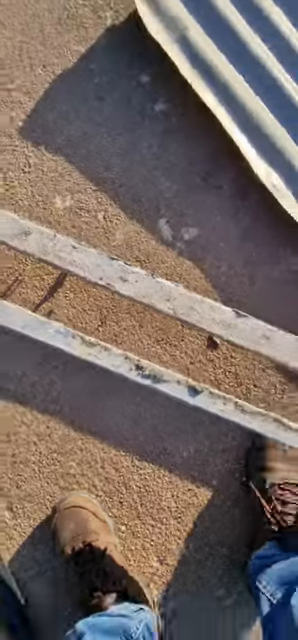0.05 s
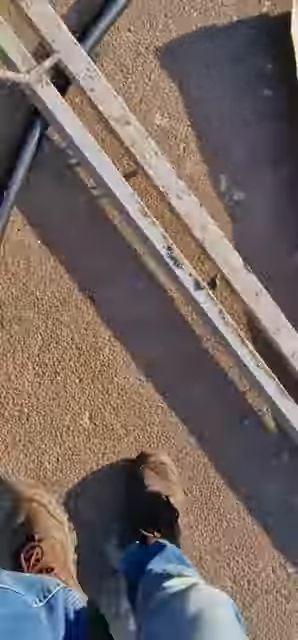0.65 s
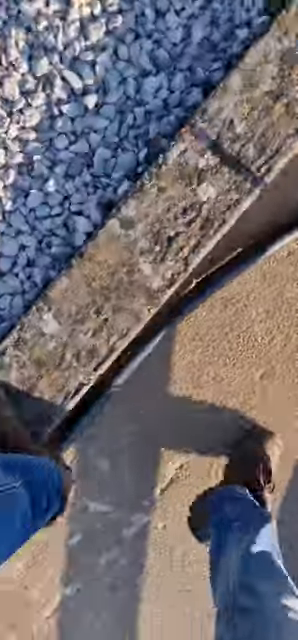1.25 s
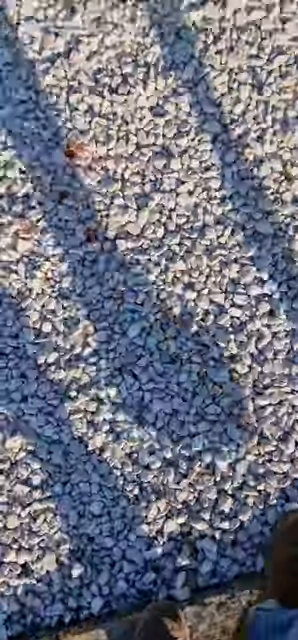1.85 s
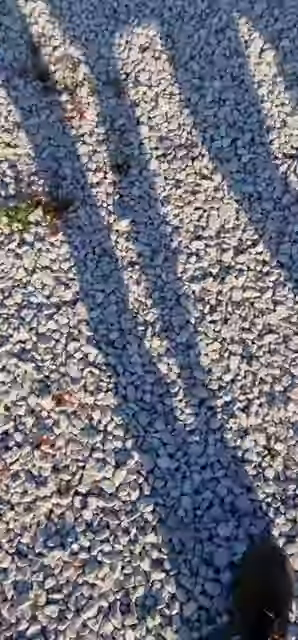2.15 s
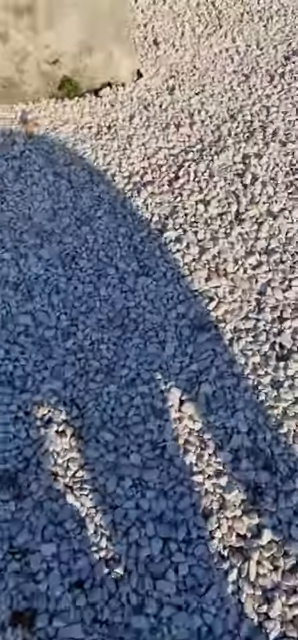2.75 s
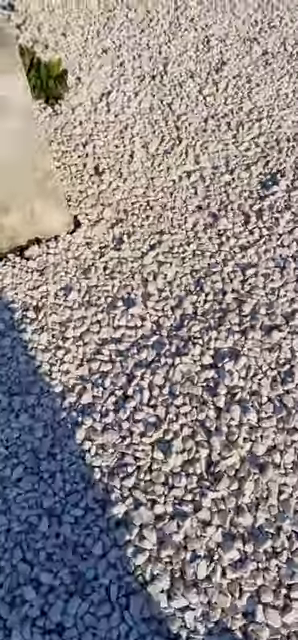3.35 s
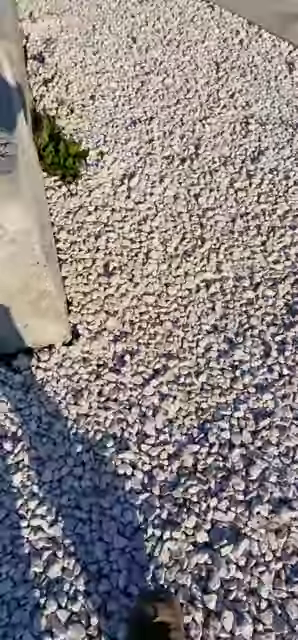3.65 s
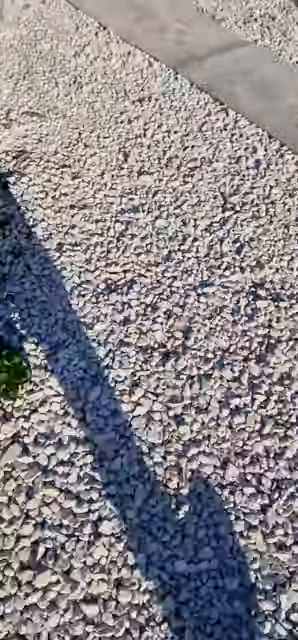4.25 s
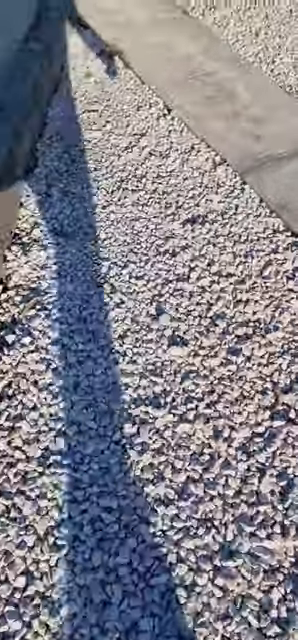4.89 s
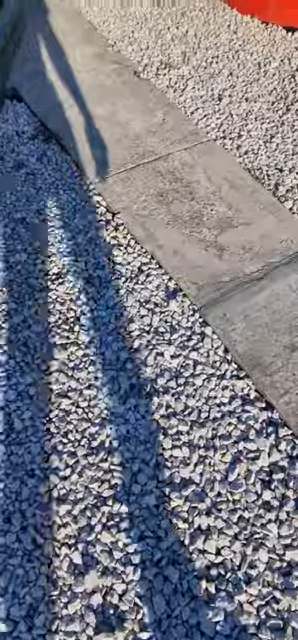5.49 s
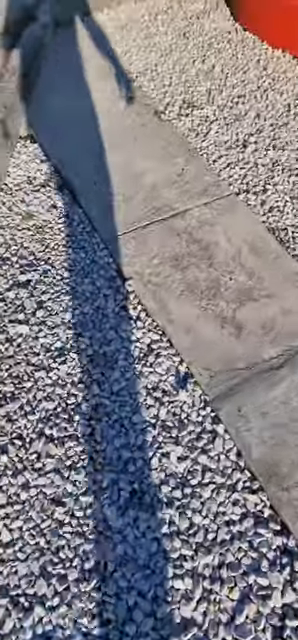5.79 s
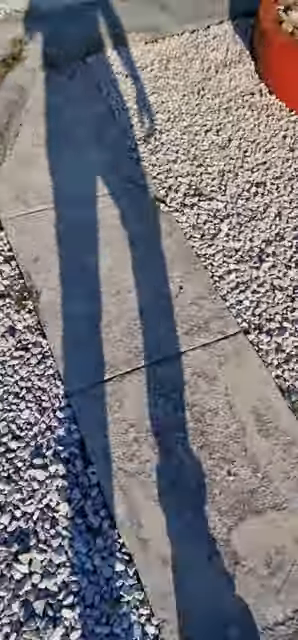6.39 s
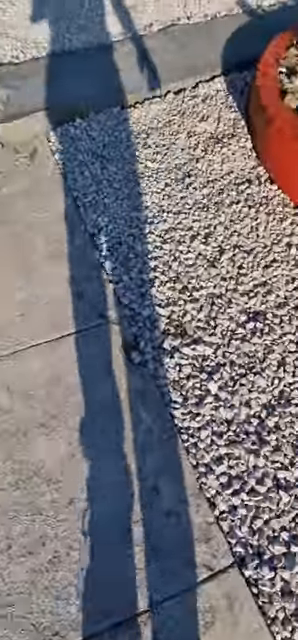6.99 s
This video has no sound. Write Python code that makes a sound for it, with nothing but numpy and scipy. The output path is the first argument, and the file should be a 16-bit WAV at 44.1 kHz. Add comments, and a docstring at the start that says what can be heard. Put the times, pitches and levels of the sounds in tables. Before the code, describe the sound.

A steel scraper rasps and rings along concrete, then knocks sharply, as boots crunch over gravel outdoors.

```python
"""Concrete edging between hard walls, with gravel underfoot. A steel hand scraper rasps along it, first
in firm ringing strokes, then in looser ones from the right. Sand breaks under the edge and rings the
blade; the edge snags on stones, squeals by stick-slip and knocks against the concrete, and the walls
answer. Close by, boots crunch over pebbles as the listener walks on, over a hush and low wind rumble."""
import sys
import numpy as np
from scipy import signal
from scipy.fft import rfft, irfft
from scipy.io import wavfile
from scipy.ndimage import uniform_filter1d

SR = 44100
rng = np.random.default_rng(int(sys.argv[2]) if len(sys.argv) > 2 else 0)


def to_wav(s):
    """Save 16-bit WAV."""
    ch = np.atleast_2d(s).T  # columns
    pcm = np.round(np.clip(ch, -1, 1) * 32767)  # PCM
    wavfile.write(sys.argv[1], SR, pcm.astype(np.int16))


N = 309955
TIME = np.arange(N) / SR

# steel resonances (frequency [Hz], width [Hz], gain [dB])
BLADE_MODES = [(1993, 8.4, 15.5), (2196, 64, 0.5)]
TOOL_OVERTONES = [(595, 48, -22), (1387, 25, 8.5), (1493, 19, 3.5), (3340, 33, -22), (4204, 39, 9.5),
                  (4710, 47, 4), (5374, 160, 2.5), (7190, 98, 1.5), (10960, 240, 3.5), (14900, 80, -2.5)]
# stereo colour of work on the right (frequency [Hz], left minus right [dB])
BALANCE_ASIDE = [(300, -1.5), (1200, -0.5), (2000, -1.5), (4300, -8.5), (5800, -5), (7200, 4), (9000, -7.5),
                 (10500, 4), (12000, -16), (15000, -8)]
# footfalls (time [s], thump [dB], scatter [dB])
FOOTFALLS = [(2.15, -44, -39), (2.73, -40, -52), (3.28, -40.5, -44), (3.792, -41, -37), (4.341, -42, -43),
             (4.91, -46, -53), (5.47, -41, -52), (6.06, -45, -44), (6.65, -52, -47)]


def strokes():
    """Scraper strokes: firm and chattering from all sides, then loose and sliding from the right."""
    # (start [s], rise [s], hold [s], grind [dB], ring [dB], rasp [dB], hiss [dB])
    passes = [(0.0, 0.0067, 0.086, -25, -22.5, -30, -27), (0.152, 0.047, 0.057, -28.5, -27.5, -36.5, -31.5),
              (0.239, 0.058, 0.039, -25.5, -23.5, -32.5, -32.5),
              (0.389, 0.08, 0.045, -22.5, -22.5, -30, -25), (0.603, 0.023, 0.032, -26.5, -23.5, -29, -25),
              (0.663, 0.032, 0.015, -24.5, -19, -23.5, -18), (0.74, .03, 0.011, -28.5, -27.5, -32, -29),
              (0.824, 0.05, 0.07, -27.5, -24, -33, -29), (1.021, 0.037, 0.023, -32.5, -29.5, -34, -27.5),
              (1.069, 0.049, 0.016, -25.5, -20.5, -20.5, -18), (1.234, 0.023, 0.023, -25.5, -23, -26, -26),
              (1.392, 0.034, 0.057, -29, -31.5, -36.5, -31.5),
              (1.602, 0.09, 0.021, -23, -28.5, -22.5, -21.5), (1.756, 0.044, 0.064, -29.5, -36, -30.5, -44),
              (1.923, .02, 0.012, -46, -53, -35.5, -54), (2.17, 0.021, .01, -30.5, -41, -32.5, -43.5),
              (2.254, 0.089, 0.03, -27.5, -25, -30, -27.5), (2.392, 0.014, 0.021, -28.5, -33.5, -38, -52),
              (2.541, .006, 0.0085, -44, -46.5, -34, -30), (2.58, 0.015, 0.009, -33, -33.5, -34, -52),
              (2.735, 0.034, 0.018, -33, -31, -32.5, -33.5), (2.817, 0.015, 0.0052, -28, -32.5, -31, -45),
              (2.925, 0.042, .025, -35, -33.5, -35, -40), (2.99, 0.028, .03, -32, -32, -36, -35.5),
              (3.093, 0.064, 0.016, -35, -35.5, -38, -40), (3.751, 0.025, .02, -36.5, -34, -44, -50.5),
              (4.233, 0.029, 0.055, -57.5, -52.5, -51.5, -52.5), (4.37, .04, 0.12, -63, -55, -53, -57.5),
              (5.578, 0.05, .03, -54, -37.5, -40, -41.5), (5.698, 0.093, 0.055, -34, -46, -45, -46),
              (5.887, 0.027, 0.065, -36, -50, -48, -50.5), (6.031, 0.029, 0.084, -43.5, -54, -60, -52),
              (6.19, 0.043, 0.05, -40.5, -54, -51.5, -64.5)]
    # grit spectra (frequency [Hz], level [dB])
    firm_grit = [(150, -23), (270, -11), (400, -9), (620, -2), (800, -9), (1100, -7), (1450, -11.5),
                 (1900, -5.5), (2700, -22), (5400, -26.5), (7300, -27), (9400, -31), (11700, -22),
                 (16000, -29.5)]
    loose_grit = [(88, -65), (150, -5.5), (321, 2.5), (439, -3), (730, 4), (1170, -4), (1480, 1.5),
                  (1720, -11.5), (2060, -10.5), (2760, -17), (5460, -27), (6770, -33.5), (9820, -44),
                  (14200, -37.5), (16000, -45)]
    # loosely held blade (frequency [Hz], width [Hz], gain [dB])
    loose_modes = [(2055, 75, 7.8), (2130, 390, 8.1)]
    # (frequency [Hz], left minus right [dB])
    firm_balance = [(300, -2.5), (1500, 4.5), (2800, -5.5), (4700, -8.5), (5500, 2.5), (6500, -3.5),
                    (7300, 17.5), (8700, -7.5), (10500, 11.5), (12000, -6), (15000, -4.5)]
    loosen_s = 2.05
    around = walls(early_db=8.5, early_s=0.011, tail_db=0.5, coherence=0.12, lag_ms=0.31)
    aside = walls(early_db=7.5, early_s=0.0066, tail_db=0.0, coherence=0.36, lag_ms=0.53)
    pressed = grains(N, per_s=5000, spread_db=2.0, clump_db=2.0, clump_hz=130)
    pressed *= chatter(per_s=46, unevenness=0.3, depth_db=7.5)
    sliding = grains(N, per_s=6500, spread_db=4.0, clump_db=2.5, clump_hz=110)
    early = [row for row in passes if row[0] < loosen_s]
    late = [row for row in passes if row[0] >= loosen_s]
    firm = scrape(early, pressed, around, firm_grit, BLADE_MODES, firm_balance,
                  overtones_db=1.5, trim_db=(-1.2, -0.72, -0.092, 0.3))
    loose = scrape(late, sliding, aside, loose_grit, loose_modes, BALANCE_ASIDE,
                   overtones_db=-2.5, trim_db=(-1.3, -0.4, -0.15, -1.2))
    return firm + loose + catches(around)


def scrape(passes, friction, space, grit, modes, balance, overtones_db, trim_db):
    """Sand grains break under the edge: they grind, rasp, hiss and keep the blade ringing."""
    grind, ring, rasp, hiss = stroke_gains(passes)
    heard = tilt_stereo(convolve(friction, space), balance)
    body = colour(heard + amp(overtones_db) * resonate(heard, TOOL_OVERTONES), grit)
    steady_ring = even_level(resonate(heard, modes), span_s=0.034)
    parts = [grind * unit(band(body, 170, 1800)),
             ring * flex(steady_ring, waver=0.0038, rate_hz=35, swell_db=1.2),
             rasp * unit(band(body, 2350, 5400)),
             hiss * unit(band(body, 5400, 17000))]
    return sum(amp(db) * part for db, part in zip(trim_db, parts))


def stroke_gains(passes):
    """Each stroke leans in, holds and dies away, treble first: four gain curves."""
    # (grind [dB/s], ring [dB/s], rasp [dB/s], hiss [dB/s])
    fall_rates = (91, 105, 125, 277)
    power, t = np.zeros((4, N)), TIME[:SR]
    for start_s, rise_s, hold_s, *levels_db in passes:
        lean = np.minimum(t / rise_s, 1)
        released_s = np.maximum(t - rise_s - hold_s, 0)
        levels = [lean * amp(db - fall * released_s) for db, fall in zip(levels_db, fall_rates)]
        add(power, start_s, np.square(levels))
    return np.sqrt(power)


def chatter(per_s, unevenness, depth_db):
    """The edge grips and slips at an uneven rate; each slip starts sharply and fades."""
    slips = np.cumsum(per_s * np.exp(unevenness * drift(per_s, N))) / SR
    return unit(amp(-depth_db * (slips % 1)))


def flex(ring, waver, rate_hz, swell_db):
    """The blade bends under the hand, so its ring wavers in pitch and swells."""
    index = np.arange(N)
    lag = waver * SR / rate_hz * drift(rate_hz, N)
    bent = np.array([np.interp(index + lag, index, side) for side in ring])
    return amp(swell_db * drift(rate_hz, N)) * bent


def catches(space, slip_s=0.0098, gain_db=-5.0, rasp_db=-29.0):
    """The edge snags on a stone and springs free in a judder that rings the blade."""
    # (time [s], level [dB])
    snags = [(0.0972, -14), (0.3127, -19.5), (0.462, 2), (0.6739, -4), (0.6948, -6.5), (0.7324, -2.5),
             (0.7786, -11)]
    out, t = np.zeros((2, N)), TIME[:SR // 2]
    release = t / slip_s * np.exp(-t / slip_s)
    for start_s, db in snags:
        judder = release * grains(len(t), per_s=3600, spread_db=4.0, clump_db=6.5, clump_hz=550)
        heard = convolve(judder, space)
        rasp = heard + resonate(heard, TOOL_OVERTONES)
        sound = resonate(heard, BLADE_MODES) + amp(rasp_db) * rasp
        add(out, start_s, amp(db + gain_db) * sound / np.abs(sound).max())
    return out


def squeals(waver=0.005, waver_hz=250, flutter_db=3.0, onset_s=0.006, release_s=0.01):
    """Fast stick-slip locks onto one high blade mode, which sings with a rough, wavering tone."""
    # (time [s], length [s], mode [Hz], level [dB])
    locks = [(0.04, 0.05, 4230, -36), (0.705, 0.04, 5470, -28), (1.25, 0.06, 5470, -35),
             (1.25, 0.06, 7200, -33), (1.255, 0.05, 10720, -31), (1.255, 0.05, 14550, -39),
             (1.33, 0.2, 3635, -40), (1.42, 0.09, 5470, -40), (1.42, 0.09, 14550, -45),
             (2.33, 0.05, 5470, -35), (2.96, 0.21, 5470, -43), (2.95, 0.22, 14650, -56),
             (5.6, 0.075, 5470, -41), (5.82, 0.055, 5470, -48)]
    out, t = np.zeros((2, N)), TIME[:SR // 2]
    space = walls(early_db=7.5, early_s=0.0059, tail_db=-15.0, coherence=0.3, lag_ms=0.48)
    for start_s, length_s, hz, db in locks:
        grip = (1 - np.exp(-t / onset_s)) * np.exp(-np.maximum(t - length_s, 0) / release_s)
        pitch_hz = hz * (1 + waver * drift(waver_hz, len(t)))
        tone = np.sin(2 * np.pi * np.cumsum(pitch_hz) / SR)
        flutter = amp(flutter_db * drift(140, len(t)))
        sound = convolve(grip * tone * flutter, space)
        add(out, start_s, amp(db) * unit_over(sound, length_s))
    return out


def knocks(crumble_share=0.47, strike_db=15.5, ring_db=2.5, glancing_db=-8.5, square_db=-6.0):
    """The tool strikes, concrete crumbles under it, the steel clanks and the walls answer."""
    # (time [s], contact [s], thud [dB], clank [dB], crack [dB], hiss [dB], reflections [dB])
    blows = [(0.62, 0.02, -39, -24.5, -35, -28.5, -13), (1.238, 0.0097, -43, -37, -25, -26, -10),
             (2.271, 0.021, -35.5, -27, -26.5, -33, -5), (2.538, 0.011, -56, -52, -31.5, -49, -1.5),
             (2.568, 0.017, -42, -24.5, -29.5, -72, 1), (2.803, 0.02, -45, -20.5, -21, -43, 0),
             (3.451, 0.26, -33, -31, -35, -52, -2), (3.547, 0.018, -22.5, -12, -12, -21.5, 1),
             (4.051, 0.038, -54, -51, -45, -54, 0), (4.723, 0.031, -63, -53, -54, -68.5, -9),
             (5.18, 0.049, -75, -55, -49, -63, -3), (5.763, 0.014, -35, -28.5, -32, -43.5, -8.5),
             (6.478, 0.12, -26, -22, -33, -45.5, 1), (6.808, 0.071, -29, -20.5, -22, -36.5, -3)]
    # tool resonances in contact (frequency [Hz], width [Hz], gain [dB])
    contact_modes = [(512, 90, -13), (1460, 16, -18), (1980, 23, -26), (1970, 34, 6), (3050, 300, 0),
                     (3870, 22, -53), (4330, 14, -13.5), (7300, 120, -1)]
    # struck concrete (frequency [Hz], level [dB])
    concrete = [(59, -40), (100, -14.5), (442, -3), (481, -2.5), (872, -4.5), (1010, -6.5), (1150, -14.5),
                (1360, -3), (1760, -8), (2370, -16), (2750, -25.5), (4380, -19), (9610, -29.5),
                (12400, -28), (16000, -42.5)]
    out, t = np.zeros((2, N)), TIME[:SR]
    hardest = np.argmax(np.array(blows)[:, 3])
    for k, (start_s, contact_s, *levels_db, walls_db) in enumerate(blows):
        space = walls(early_db=6.0 + walls_db, early_s=0.041, tail_db=11.5 + walls_db,
                      coherence=0.39, lag_ms=0.5)
        force = grains(len(t), per_s=2500, spread_db=4.5, clump_db=-1.5, clump_hz=310)
        force *= np.exp(-t / (crumble_share * contact_s))
        force[0] += amp(strike_db)
        impact = colour(force + amp(ring_db) * resonate(force, contact_modes), concrete)
        steel = amp(square_db) * tool_ring(t) if k == hardest else amp(glancing_db) * clang(t)
        sound = tilt_stereo(convolve(unit(impact) + steel, space), BALANCE_ASIDE)
        add(out, start_s, weigh_bands(sound, contact_s, levels_db))
    return out


def tool_ring(t):
    """A square blow sets the whole tool ringing."""
    # (frequency [Hz], width [Hz], level [dB])
    modes = [(1065, 11.6, -4.5), (1320, 29, -25), (1726, 14, 0.5), (1960, 39, 0), (2730, 57, -5),
             (3760, 83, -14), (4060, 45, -8.5), (4425, 48, -8.5), (5440, 73, -8.5)]
    return unit(sum(amp(db) * np.sin(2 * np.pi * hz * t) * np.exp(-np.pi * width_hz * t)
                    for hz, width_hz, db in modes))


def clang(t, sharp_hz=244.0, relax_s=0.0059, decay_s=0.023):
    """A glancing blow bends the blade: it rings sharp, then sinks to its own pitch."""
    hz = BLADE_MODES[0][0] + sharp_hz * np.exp(-t / relax_s)
    return unit(np.sin(2 * np.pi * np.cumsum(hz) / SR) * np.exp(-t / decay_s))


def gravel(rise_share=0.089, settle_db=-19.0, settle_s=0.0616, crunch_db=1.5, scatter_db=-5.0):
    """Pebbles grind together under the sole and a few settle afterwards; each step scatters more."""
    # (time [s], length [s], thud [dB], crack [dB])
    crunches = [(2.104, 0.036, -38.5, -44), (2.16, 0.014, -43, -33), (3.276, 0.043, -47, -42.5),
                (3.351, 0.012, -36.5, -36), (3.403, 0.004, -46, -42), (3.797, 0.026, -43, -30.5),
                (3.989, 0.0049, -53.5, -38.5), (4.306, 0.0042, -54, -37), (4.38, 0.05, -48, -41),
                (4.914, 0.029, -38.5, -35.5), (4.957, 0.0026, -26.5, -38), (4.986, 0.035, -44, -42),
                (5.009, 0.014, -41, -33), (5.036, 0.0068, -42, -42.5), (5.137, 0.0021, -45.5, -46.5),
                (5.27, 0.0034, -34, -27.5), (5.392, 0.02, -48.5, -53), (5.46, 0.053, -43.5, -39.5),
                (5.49, 0.02, -35.5, -27.5), (5.525, 0.0058, -37, -32), (5.552, 0.0038, -29.5, -30.5),
                (6.047, 0.036, -46, -35.5), (6.077, 0.023, -37, -39), (6.156, 0.015, -40, -40.5),
                (6.214, 0.003, -40.5, -40), (6.656, 0.0067, -47, -40.5), (6.687, 0.0014, -59, -37.5),
                (6.745, 0.0083, -42, -55)]
    # (frequency [Hz], level [dB])
    pebble_spectrum = [(88, -27.5), (150, -2), (730, 3), (1190, -1.5), (2060, -0.5), (2920, -12), (3290, 0),
                       (4410, 3), (4860, 1), (5790, -13), (8070, -10), (9630, -18.5), (11700, -7.5),
                       (15100, -19.5), (16000, -47)]
    # (frequency [Hz], left minus right [dB])
    balance = [(300, -1.5), (2000, -4.5), (4400, -14.5), (6000, -1.5), (7500, 10), (9500, -11.5),
               (11500, -11), (14000, -12)]
    out, t = np.zeros((2, N)), TIME[:SR // 3]
    # each spot of ground has its own colour
    spots = [walls(early_db=-1.0, early_s=0.0012, tail_db=-19.5, coherence=0.083, lag_ms=0.38)
             for _ in range(4)]
    for k, (start_s, length_s, thud_db, crack_db) in enumerate(crunches):
        push = 1 - np.exp(-t / (rise_share * length_s))
        push *= np.exp(-np.maximum(t - length_s / 2, 0) / length_s)
        crush = push * grains(len(t), per_s=8000, spread_db=2.5, clump_db=4.5, clump_hz=385)
        settle = grains(len(t), per_s=750, spread_db=7.0, clump_db=-7.5, clump_hz=95)
        settle *= amp(settle_db) * np.exp(-t / settle_s)
        stones = colour(crush + settle, pebble_spectrum)
        sound = tilt_stereo(convolve(stones, spots[k % len(spots)]), balance)
        clack_db, hiss_db = (thud_db + crack_db) / 2 - 3.5, crack_db - 6
        levels_db = thud_db, clack_db, crack_db, hiss_db
        add(out, start_s, amp(crunch_db) * weigh_bands(sound, length_s, levels_db))
    weight = treads([(s, db) for s, _, db in FOOTFALLS], fall_s=0.094)
    hits = weight * grains(N, per_s=790, spread_db=2.0, clump_db=4.0, clump_hz=23)
    click = colour(np.eye(1, SR // 10), pebble_spectrum)
    scatter = convolve(hits, click / np.linalg.norm(click))
    return out + amp(scatter_db) * tilt_stereo(convolve(scatter, spots[0]), balance)


def treads(steps, fall_s, rise_s=0.025):
    """Gain curve: weight comes quickly onto each step (time [s], level [dB]) and eases off."""
    out, t = np.zeros((1, N)), TIME[:SR]
    weight = np.minimum(t / rise_s, 1) * np.exp(-np.maximum(t - rise_s, 0) / fall_s)
    for start_s, db in steps:
        add(out, start_s, amp(db) * weight[None])
    return out[0]


def walls(early_db, early_s, tail_db, coherence, lag_ms):
    """Stereo response: direct sound, a quick cluster of near reflections, a tail longest in the bass."""
    # (frequency [Hz], T60 [s])
    decay_times = [(150, 2.1), (500, 0.61), (2000, 0.49), (5000, 0.43), (9000, 0.22), (15000, 0.37)]
    out, t = np.zeros((2, SR)), TIME[:SR]
    edges_hz = np.geomspace(60, 19000, 11)
    white = rng.standard_normal((2, 3, SR))
    white *= unit(amp(2.53 * drift(500, SR)))   # reflections arrive in bunches
    early = unit(np.exp(-t / early_s))
    for k, (low, high) in enumerate(zip(edges_hz, edges_hz[1:])):
        hz = np.sqrt(low * high)
        noise = band(white[k % 2], low, high, order=2)
        shared = max(coherence, 1 / (1 + (hz / 520) ** 4))   # long waves reach both sides alike
        tail = unit(amp(-60 * t / at_hz(decay_times, hz)) * (1 - np.exp(-t / 0.0036)))
        envelope = np.hypot(amp(early_db) * early, amp(tail_db) * tail) / np.sqrt(SR)
        out += envelope * (np.sqrt(shared) * noise[2] + np.sqrt(1 - shared) * noise[:2])
    out[:, 0] += 1
    return delay_left(out, lag_ms)


def rumble(side_db=-15.5, gain_db=0.5):
    """Wind on the microphone and footfall thumps: low noise, nearly alike on both sides."""
    # (time [s], level [dB])
    gusts = [(0.0, -40), (0.25, -46), (0.36, -38), (0.46, -45.5), (1.05, -51), (1.3, -41.5), (1.5, -52),
             (3.44, -53.5), (3.56, -37.5), (3.95, -54.5), (4.6, -56), (5.65, -58), (5.8, -52.5),
             (7.03, -55)]
    # (frequency [Hz], level [dB])
    spectrum = [(12, -33.5), (20, -12.5), (54, 3.5), (189, -3.5), (300, -2.5), (390, -32), (660, -120)]
    mid, side = colour(rng.standard_normal((2, N)), spectrum, size=8192)
    noise = unit(band(mid + amp(side_db) * side * [[1], [-1]], 12, 260, order=3))
    wind = amp(np.interp(TIME, *np.transpose(gusts)))
    thumps = treads([(s, db) for s, db, _ in FOOTFALLS], fall_s=0.051)
    return amp(gain_db) * np.hypot(wind, thumps) * noise


def hush(level_db=-58.5):
    """Steady distant noise of the open air."""
    # (frequency [Hz], level [dB])
    spectrum = [(15, -34), (25, -5), (76, -13.5), (754, -9.5), (1190, -20.5), (2050, -12), (2760, -26),
                (4370, -10), (6050, -33.5), (7510, -29), (16000, -40.5)]
    return amp(level_db) * unit(colour(rng.standard_normal((2, N)), spectrum))


def amp(db):
    """Decibels to gain."""
    return 10 ** (np.asarray(db) / 20)


def unit(x):
    """Scale to rms 1."""
    return x / np.sqrt(np.mean(x ** 2) + 1e-20)


def unit_over(x, length_s):
    """Scale to rms 1 over the opening span."""
    return x / np.sqrt(np.mean(x[:, :round(length_s * SR)] ** 2) + 1e-20)


def even_level(x, span_s):
    """Hold the level steady over the given span."""
    power = uniform_filter1d(np.mean(x ** 2, axis=0), round(span_s * SR))
    return x / np.sqrt(np.maximum(power, 0) + 1e-3 * power.mean())


def weigh_bands(sound, length_s, levels_db):
    """Set a contact's level in four bands, thud to hiss, over the time it lasts."""
    edges_hz = 90, 1200, 2500, 5500, 17000
    return sum(amp(db) * unit_over(band(sound, low, high, order=3), length_s)
               for low, high, db in zip(edges_hz, edges_hz[1:], levels_db))


def at_hz(points, hz):
    """Read a table on a log-frequency axis."""
    table_hz, values = np.transpose(points)
    return np.interp(np.log(np.maximum(hz, 1)), np.log(table_hz), values)


def band(x, low_hz, high_hz, order=4):
    """Butterworth band-pass."""
    return signal.sosfilt(signal.butter(order, [low_hz, high_hz], "band", fs=SR, output="sos"), x)


def convolve(x, response):
    """Convolve each channel, keeping the length."""
    return signal.fftconvolve(np.atleast_2d(x), np.atleast_2d(response), axes=1)[:, :np.shape(x)[-1]]


def colour(x, spectrum, size=2048):
    """Minimum-phase filter with the given dB spectrum."""
    gain = amp(at_hz(spectrum, np.fft.rfftfreq(size, 1 / SR)))
    cepstrum = irfft(np.log(gain))
    cepstrum[1:size // 2] *= 2
    cepstrum[size // 2 + 1:] = 0
    return convolve(x, irfft(np.exp(rfft(cepstrum))))


def resonate(x, modes):
    """Parallel two-pole resonances."""
    out = 0
    for hz, width_hz, db in modes:
        r = np.exp(-np.pi * width_hz / SR)
        zeros = [(1 - r * r) / 2, 0, (r * r - 1) / 2]
        poles = [1, -2 * r * np.cos(2 * np.pi * hz / SR), r * r]
        out = out + amp(db) * signal.lfilter(zeros, poles, x + 1e-18)
    return out


def drift(rate_hz, n):
    """Smooth random curve with spread about 1."""
    points = rng.standard_normal(int(n / SR * rate_hz) + 2)
    return np.interp(np.arange(n) / SR * rate_hz, np.arange(len(points)), points)


def grains(n, per_s, spread_db, clump_db, clump_hz):
    """Tiny random fractures of uneven size that come in clumps; rms 1."""
    sizes = amp(spread_db * np.minimum(rng.exponential(1, n), 4)) * rng.choice([-1, 1], n)
    breaks = rng.random(n) < per_s / SR
    return unit(sizes * breaks * amp(abs(clump_db) * drift(clump_hz, n)))


def delay_left(pair, lag_ms):
    """Sound from the right reaches the left side later."""
    index = np.arange(pair.shape[1])
    left = np.interp(index - round(lag_ms * SR / 1000), index, pair[0], left=0)
    return np.array([left, pair[1]])


def tilt_stereo(pair, balance):
    """The two microphone ports colour sound differently; each gets half of the balance."""
    return np.vstack([colour(side, [(hz, sign * db / 2) for hz, db in balance], size=512)
                      for side, sign in zip(pair, (1, -1))])


def add(out, start_s, sound):
    """Mix a sound in at a time."""
    start = round(start_s * SR)
    out[:, start:start + sound.shape[1]] += sound[:, :N - start]


def scene():
    """Tool work, footsteps and open air."""
    return strokes() + squeals() + knocks() + gravel() + hush() + rumble()


def record(dry):
    """Round the highest peaks and cut the top."""
    lowpass = signal.ellip(10, 0.1, 80, 15900, fs=SR, output="sos")
    return signal.sosfilt(lowpass, 1.325 * np.tanh(dry / 1.282))


dry = scene()
out = record(dry)
to_wav(out)
```